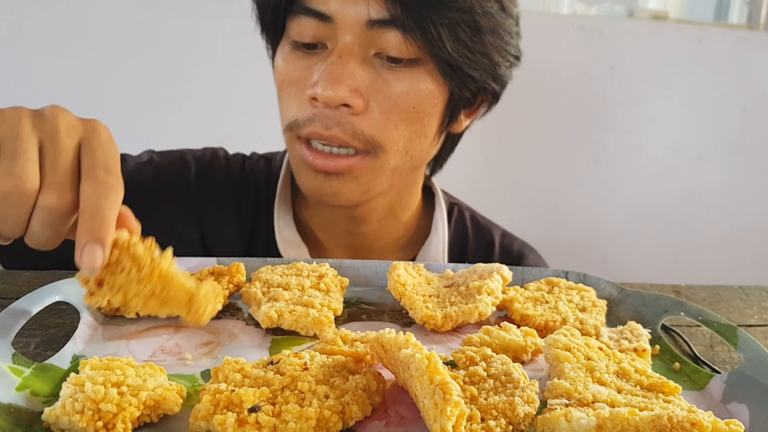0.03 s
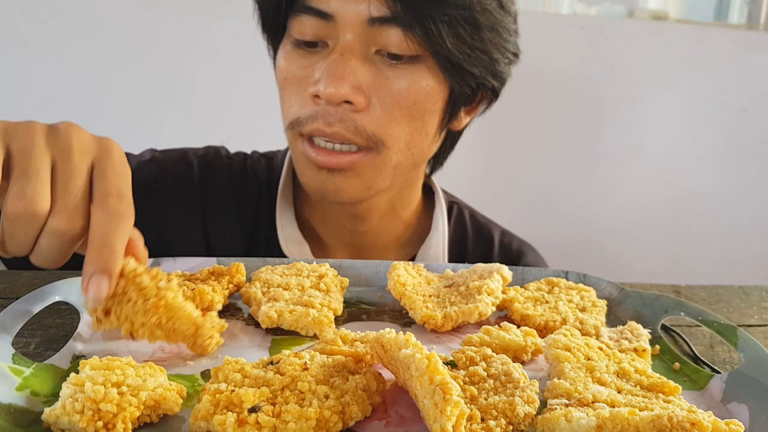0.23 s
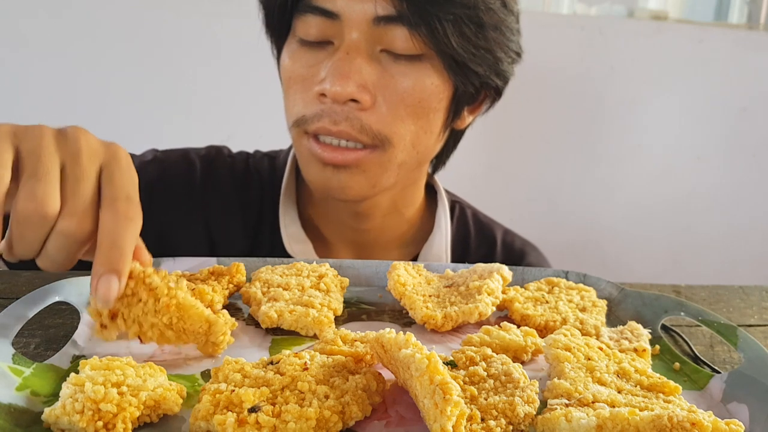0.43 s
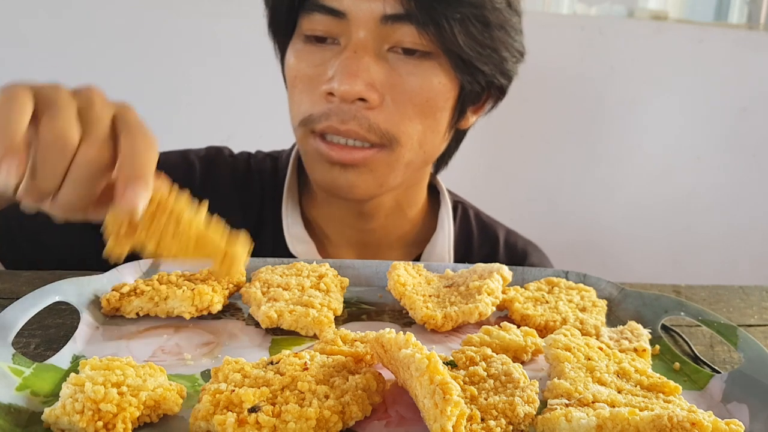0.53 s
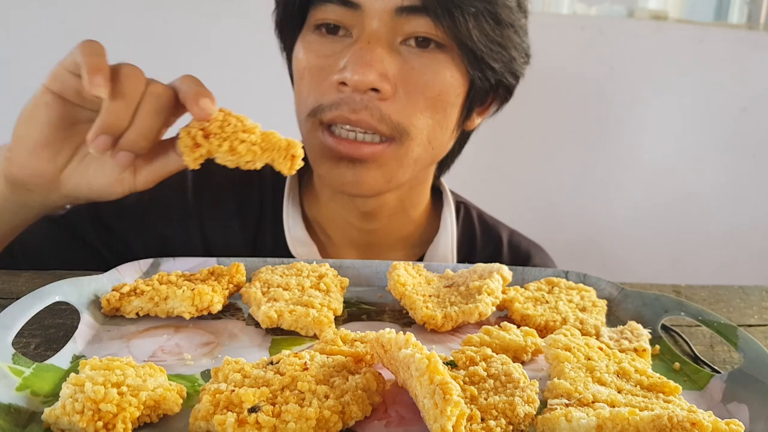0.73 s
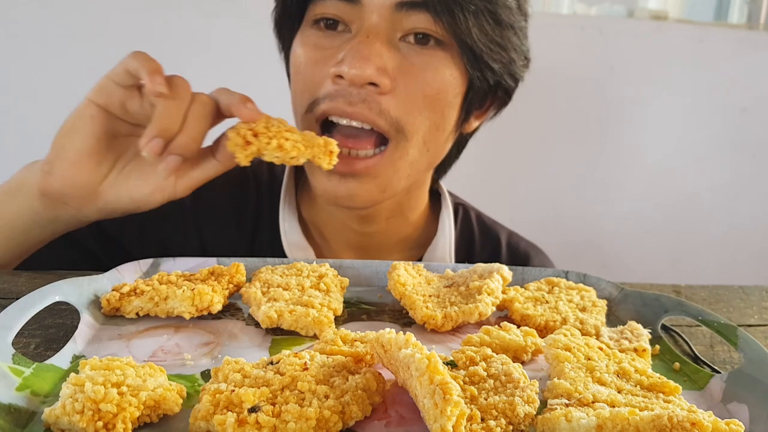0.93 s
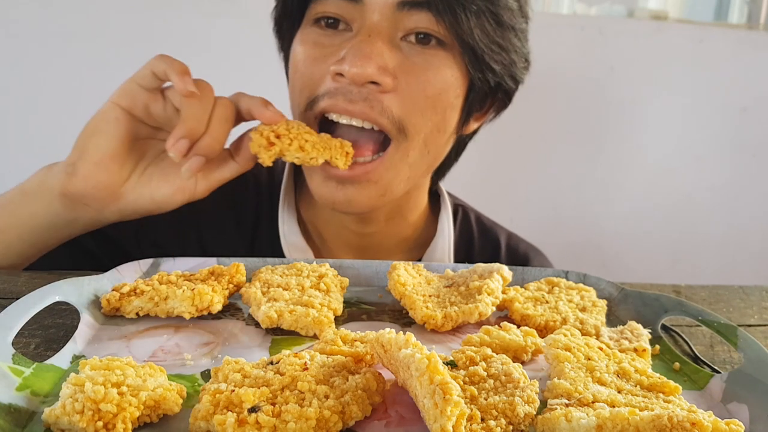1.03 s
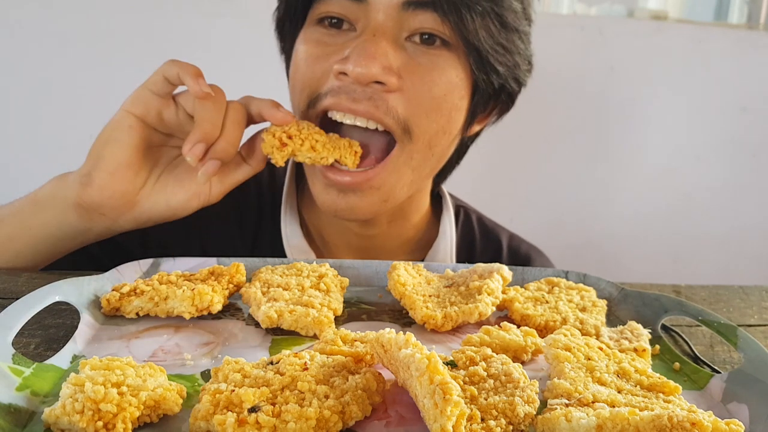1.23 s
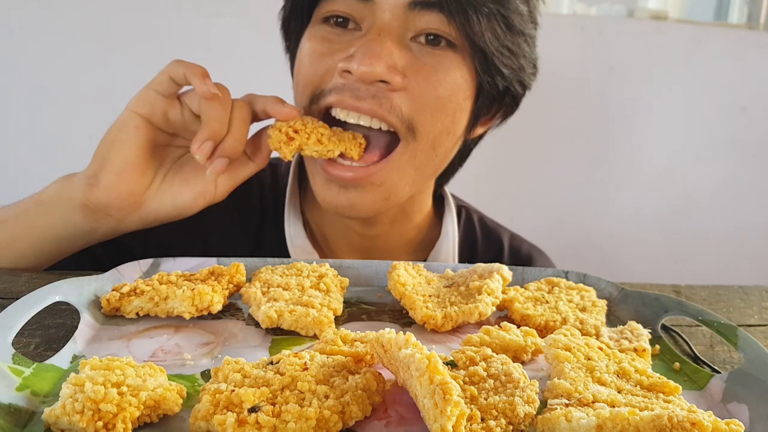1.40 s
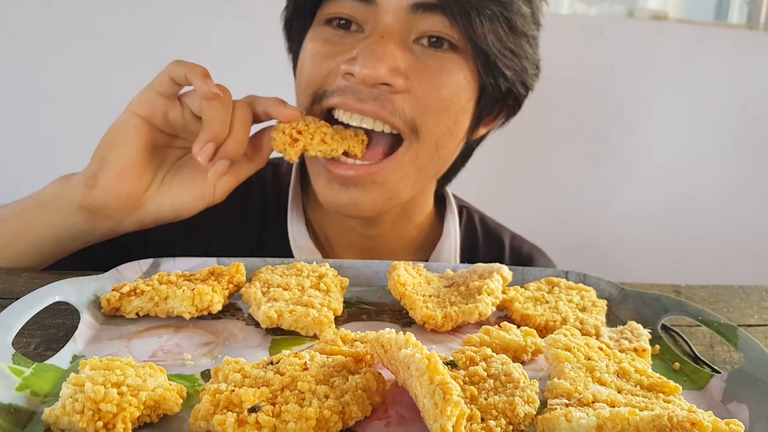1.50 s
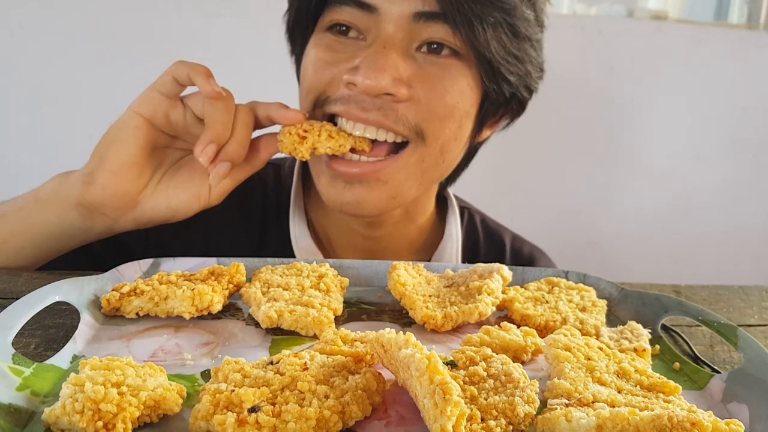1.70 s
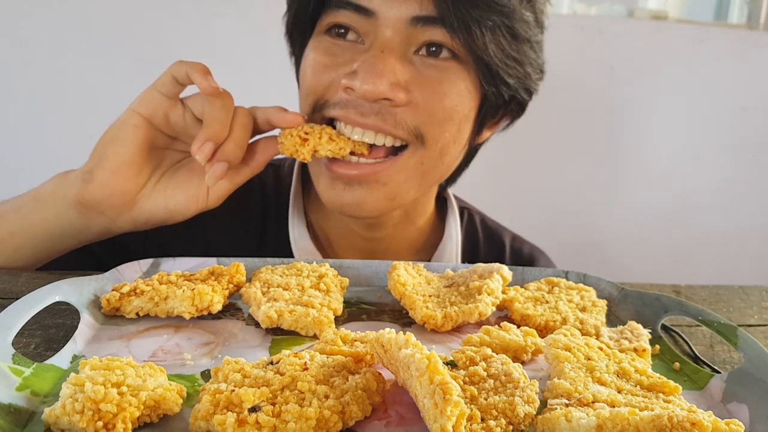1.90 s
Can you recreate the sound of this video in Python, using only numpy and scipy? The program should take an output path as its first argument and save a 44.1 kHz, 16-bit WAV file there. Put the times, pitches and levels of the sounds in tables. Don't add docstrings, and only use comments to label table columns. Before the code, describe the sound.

Crispy fried food knocked twice on a plastic plate, then bitten with a brittle crackling crunch

```python
import sys
import numpy as np
from scipy import signal
from scipy.fft import rfft, irfft
from scipy.io import wavfile
from scipy.ndimage import uniform_filter1d

SR = 44100
rng = np.random.default_rng(int(sys.argv[2]) if len(sys.argv) > 2 else 0)


def gain_from_db(level_db):
    decades = np.asarray(level_db, float) / 20
    return 10 ** decades


def log_audio(samples):
    frames = np.atleast_2d(samples).T
    limited = np.clip(frames, -1, 1)
    pcm = np.round(limited * 32767).astype(np.int16)
    wavfile.write(sys.argv[1], SR, pcm)


N = 85995


def rms_one(x):
    return x / np.sqrt(np.mean(x ** 2) + 1e-20)


def in_time(rows):
    s, db = np.transpose(rows)
    return np.interp(np.arange(N) / SR, s, db, left=-120, right=-120)


def at_hz(points, hz):
    table_hz, values = np.transpose(points)
    return np.interp(np.log(hz), np.log(table_hz), values)


def low_pass(x, hz, order=2):
    return signal.sosfilt(signal.butter(order, hz, fs=SR, output="sos"), x)


def high_pass(x, hz, order):
    return signal.sosfilt(signal.butter(order, hz, "high", fs=SR, output="sos"), x)


def click_at(s, height):
    click = np.zeros(N)
    click[int(s * SR)] = height
    return click


def ring(clicks, hz, t60):
    r, w = gain_from_db(-60 / (t60 * SR)), 2 * np.pi * hz / SR
    return signal.lfilter([0, np.sin(w)], [1, -2 * r * np.cos(w), r * r], clicks + 1e-18)


def drift(rate):
    hop, settle = 40, 2000
    r = np.exp(-2 * np.pi * rate * hop / SR)
    white = rng.standard_normal(N // hop + settle + 2)
    slow = signal.lfilter([1], [1, -2 * r, r * r], white)[settle:]
    return np.interp(np.arange(N) / hop, np.arange(len(slow)), rms_one(slow - slow.mean()))


def coloured(x, spectrum):
    hz = np.maximum(np.fft.rfftfreq(N, 1 / SR), 1)
    return rms_one(irfft(rfft(x) * gain_from_db(at_hz(spectrum, hz)), N))


def dying(starts, spectrum, t60s, rise_s):
    edges = 60 * 2 ** np.arange(0, 8.3, 1 / 3)
    t, out, power = np.arange(N) / SR, 0, 0
    white = rng.standard_normal((2, N))
    for k, (low, high) in enumerate(zip(edges, edges[1:])):
        hz = np.sqrt(low * high)
        energy, t60 = np.zeros(N), at_hz(t60s, hz)
        for s, db in starts:
            span = slice(max(int(s * SR) + 1, 0), int((s + 2 * t60) * SR))
            since = t[span] - s
            fall = gain_from_db(db - 60 * since / t60)
            energy[span] += (fall * (1 - np.exp(-since / rise_s))) ** 2
        band_pass = signal.butter(2, [low, high], "band", fs=SR, output="sos")
        band = gain_from_db(at_hz(spectrum, hz)) * signal.sosfilt(band_pass, white[k % 2])
        out = out + band * np.sqrt(energy)
        power = power + np.mean(band ** 2)
    return out / np.sqrt(power)


# (frequency [Hz], level [dB per Hz])
AIR_SPECTRUM = [(100, -25), (300, -21), (1000, -35), (2300, -38), (4000, -27), (9500, -35), (12000, -42),
                (16000, -49)]
AIR_DB = -67.5
# (time [s], level [dB])
GATE = [
    (0, -1),
    (.5, 2),
    (.72, -2),
    (1.595, -1),
    (1.61, 4),
    (1.95, 5),
]
# (time [s], level [dB])
THROB = [(0, -37.5), (.15, 7), (.59, -12), (.645, 16.5), (.7, -6), (.78, 7.5), (.83, 9.5), (.87, 1.5),
         (.95, 15.5), (1.01, 1.5), (1.06, 6), (1.13, 0), (1.19, 10), (1.26, -12), (1.45, -4), (1.6, -5),
         (1.95, -4)]
# (time [s], level [dB])
HUM = [
    (1.3, -84),
    (1.42, -71),
    (1.5, -65),
    (1.58, -73.5),
    (1.62, -59.5),
    (1.66, -83),
]
# (time [s], level [dB])
LOWER_HUM = [
    (1.58, -87),
    (1.63, -62),
    (1.68, -79.5),
    (1.74, -69.5),
    (1.8, -80),
    (1.86, -64),
    (1.95, -49.5),
]


def room_air():
    throb_hz, throb_width_hz, throb_db = 72, 22, -66
    hum_hz, lower_hum_hz = 341, 290
    white = rng.standard_normal((3, N + SR))
    throb = rms_one(ring(ring(white[0], throb_hz, 1.6 / throb_width_hz), throb_hz, .06)[SR:])
    throb = throb / np.sqrt(uniform_filter1d(throb ** 2, size=2600) + .15)
    hum = rms_one(ring(ring(white[1], hum_hz, .22), hum_hz, .017)[SR:])
    lower = rms_one(ring(ring(white[2], lower_hum_hz, .11), lower_hum_hz, .04)[SR:])
    hiss = rms_one(high_pass(coloured(rng.standard_normal(N), AIR_SPECTRUM), 60, 2))
    air = gain_from_db(AIR_DB + in_time(GATE) + 1.2 * drift(3.6)) * hiss
    engine = gain_from_db(throb_db + in_time(THROB)) * throb
    motor = gain_from_db(in_time(HUM)) * hum + gain_from_db(in_time(LOWER_HUM)) * lower
    return air + engine + motor


# (time [s], level [dB], frequency [Hz], t60 [s])
BUMPS = [
    (1.767, -35, 55.8, 0.13),
    (1.835, -39, 58, 0.12),
]


def bumps():
    out = 0
    for s, db, hz, t60 in BUMPS:
        push = low_pass(click_at(s, gain_from_db(db)), 1.76 * hz)
        out = out + ring(push, hz, t60)
    return out


# (time [s], level [dB])
MOVING = [
    (0, -76),
    (.09, -69.5),
    (.17, -61.5),
    (.205, -50),
    (.22, -69),
    (.38, -71.5),
    (.41, -64.5),
    (.43, -70.5),
    (.75, -78),
]
# (frequency [Hz], level [dB per Hz])
RUSTLE_SPECTRUM = [(1180, -63), (2000, -34), (2450, -11), (3020, -13.5), (4770, 0.5), (12000, -16),
                   (15600, -46), (22000, -120)]


def rustle():
    return gain_from_db(in_time(MOVING) + 1.7 * drift(25)) * coloured(rng.standard_normal(N), RUSTLE_SPECTRUM)


# (time [s], level [dB])
KNOCKS = [
    (-.2, -1),
    (.210, -5.5),
    (0.4154, -5),
]
# (frequency [Hz], level [dB per Hz])
ANSWER_SPECTRUM = [(100, -9), (300, -6), (1000, -16), (2800, -19), (5000, -23.5), (6200, -33.5),
                   (9000, -38.5), (14000, -47.5)]
# (frequency [Hz], t60 [s])
ANSWER_T60 = [(100, 0.69), (500, 0.49), (2000, 0.61), (5000, 0.75), (12000, 0.19)]


def room_answer():
    earlier = dying(KNOCKS[:1], ANSWER_SPECTRUM, ANSWER_T60, rise_s=.0035)
    later = dying(KNOCKS[1:], ANSWER_SPECTRUM, ANSWER_T60, rise_s=.015)
    return gain_from_db(-31) * (low_pass(earlier, 1400, 4) + later)


# (frequency [Hz], level [dB per Hz])
RATTLE_SPECTRUM = [(180, -28.5), (300, 4), (850, -10.5), (1250, -1.5), (1530, -13), (2210, -15.5),
                   (3830, 1), (16000, -45)]
# (frequency [Hz], t60 [s])
RATTLE_T60 = [(300, 0.076), (800, 0.088), (1500, 0.078), (5000, 0.023), (14000, .01)]


def rattle():
    starts = [(s, db) for s, db, _ in TOUCHES]
    return gain_from_db(-7) * dying(starts, RATTLE_SPECTRUM, RATTLE_T60, rise_s=.0004)


# (frequency [Hz], level [dB per Hz])
DUST_SPECTRUM = [(600, -7), (1500, -20), (4500, 0), (9000, -24), (15500, -15.5)]
# (frequency [Hz], t60 [s])
DUST_T60 = [(1000, 0.048), (5000, 0.0087), (15000, 0.02)]


def dust():
    starts = [(s, db) for s, db, *_ in CRACKS]
    return gain_from_db(-18) * dying(starts, DUST_SPECTRUM, DUST_T60, rise_s=.00009)


# (time [s], level [dB])
PRESSURE = [
    (1.598, -65),
    (1.608, -54.5),
    (1.67, -54.5),
    (1.74, -50),
    (1.78, -56),
    (1.8, -49),
    (1.82, -56),
    (1.87, -56.5),
    (1.95, -51),
]
# (frequency [Hz], level [dB per Hz])
CRUMBLE_SPECTRUM = [(400, -7), (839, -11.5), (1030, -5), (1580, -7.5), (2600, -2.5), (4800, -3),
                    (6800, -6.5), (8500, -15), (16000, -40)]


def crumble():
    crumbs_per_s, spread_db, click_share = 2500, 3.0, .3
    sizes = gain_from_db(spread_db * np.minimum(rng.exponential(1, N), 4)) * rng.choice([-1, 1], N)
    breaks = rng.random(N) < crumbs_per_s * gain_from_db(5 * drift(25)) / SR
    grains = rms_one(sizes * breaks)
    mix = click_share * grains + np.sqrt(1 - click_share ** 2) * rng.standard_normal(N)
    return gain_from_db(in_time(PRESSURE)) * coloured(mix, CRUMBLE_SPECTRUM)


# (time [s], strength [dB], pitch [Hz])
TICKS = [(.2335, -40, 9200), (.2345, -33, 12200), (.2360, -45, 13860), (1.1625, -43, 7400),
         (1.670, -41.5, 5900), (1.682, -40.5, 6200), (1.6825, -42.5, 3300), (1.693, -32.5, 6180),
         (1.732, -39, 6200), (1.774, -44, 6000), (1.789, -31.5, 5730), (1.7985, -31.5, 5780),
         (1.7993, -33, 3620), (1.8008, -26.5, 6000), (1.8887, -21, 6017), (1.8891, -32.5, 5014)]


def ticks():
    out = np.zeros(N)
    for s, db, hz in TICKS:
        click, t60 = click_at(s, gain_from_db(db)), 14 / hz
        rings = ring(click, hz, t60)
        rings -= .7 * ring(click, 1.17 * hz, t60)
        rings += .3 * ring(click, .75 * hz, .6 * t60)
        out += high_pass(rings, .6 * hz, 2)
    return out


# (time [s], strength [dB], length [s], share that rings the open mouth [dB])
CRACKS = [(1.8762, -20, 0.00066, -24.5), (1.8777, -10.5, 0.00091, 2), (1.8785, -17, .0007, -34),
          (1.8794, -16.5, 0.00078, -38), (1.8807, -20, 0.00043, -10.5), (1.8812, -21.5, 0.00059, -20),
          (1.8893, -29.5, 0.00089, -8.5), (1.8989, -37, .001, -18.5), (1.9010, -35, .001, -9),
          (1.9022, -26, 0.001, -8), (1.9061, -27, .0018, -8.5), (1.9085, -37, .0015, -18),
          (1.9117, -35, .001, -18.5), (1.9130, -18.5, .0005, -33), (1.9135, -18.5, 0.00103, 1.5),
          (1.9146, -22.5, .001, -20), (1.9170, -24, 0.0017, -4), (1.9204, -32, 0.0021, -6),
          (1.9223, -24.5, 0.00076, -1), (1.9245, -28.5, 0.0022, -17.5), (1.9274, -20.5, .001, 1)]
# (frequency [Hz], level [dB], t60 [s])
CAKE_MODES = [(980, -17.5, 0.0087), (2070, -32, .004), (3020, -8, 0.017), (3380, -8.5, 0.0065),
              (4090, -2.5, 0.0046), (4670, -5, 0.0048), (5570, -7, .006), (6200, -2.5, 0.0071),
              (6700, -4, 0.0051), (7400, -13.5, 0.0046), (9320, -16, 0.0037), (13040, -21, 0.0035)]


def cracks():
    splits_per_s = 8100
    t, splits, mouth = np.arange(N) / SR, np.zeros(N), np.zeros(N)
    run = rng.standard_normal(N) * (rng.random(N) < splits_per_s / SR)
    for s, db, length, mouth_db in CRACKS:
        splits -= click_at(s, gain_from_db(db))
        mouth -= click_at(s, gain_from_db(db + mouth_db))
        during = (t > s) * (t < s + length)
        splits += 0.42 * gain_from_db(db) * run * during * np.exp(-np.abs(t - s) / length)
    rings = 0
    for hz, db, t60 in CAKE_MODES:
        luck = gain_from_db(2.5 * rng.standard_normal(N))
        rings = rings + 0.44 * gain_from_db(db) * ring(splits * luck, hz, t60)
    cavity = ring(mouth, 1440, .017) + gain_from_db(-20) * ring(mouth, 630, .02)
    return high_pass(rings + 1.1 * splits, 850, 3) + high_pass(0.61 * cavity, 945, 2)


# (time [s], strength [dB], hardness [Hz])
TOUCHES = [(0.2086, -29.5, 2950), (.2100, 0.5, 7400), (0.2115, -5.5, 3870), (0.2139, -17, 2950),
           (0.2147, -5.5, 4950), (0.2169, -7, 6400), (0.2332, -23.5, 9000), (.356, -51, 6000),
           (0.4107, -35.5, 2220), (.4148, 1.5, 6900), (.4163, -12.5, 5100), (0.419, -8.5, 3985),
           (.4200, -3.5, 3950), (0.4222, -5, 5140), (0.4259, -14.5, 4000), (0.4312, -19, 5000)]
# (frequency [Hz], level [dB], t60 [s])
PLATE_MODES = [(743, -18.5, 0.073), (858, -18, 0.1), (1087.4, -13.5, 0.093), (1254, -25, 0.1),
               (1465, -21, 0.064), (1673, -10, 0.032), (1820, -16.5, 0.086), (2138.5, -5.5, 0.033),
               (2880, -18, 0.037), (3041, -7.5, 0.031), (3280, -21.5, .03), (3800, -10.5, 0.11),
               (3830, -17, 0.031)]
# (frequency [Hz], level [dB], t60 [s])
TABLE_MODES = [(146, -15.5, .1), (158.4, -6.5, .07), (172, -33.5, 0.46), (212, -5, 0.031), (240, -8, 0.088),
               (273.3, -16.5, 0.16), (345, -10, 0.077), (443.2, 0, 0.052), (556.5, -12.5, 0.12),
               (640, -5.5, 0.021)]
# (frequency [Hz], level [dB], t60 [s])
SWAY_MODES = [(75.5, -29, .5), (78.7, -30, .5)]


def plate_knocks():
    length = SR // 2
    out = np.zeros(N)
    for s, db, hard_hz in TOUCHES:
        click = np.zeros(length)
        click[0] = gain_from_db(db - 6)
        hard = low_pass(click, hard_hz)
        sound = 3.6 * signal.lfilter([1, -1], [1, -.8], hard) + 3.2 * ring(hard, 2400, .003)
        for k, (hz, level_db, t60) in enumerate(PLATE_MODES):
            strength = (-1) ** k * gain_from_db(level_db + 3.5 * rng.standard_normal())
            sound = sound + strength * ring(hard, hz, min(t60, 62 / hz))
        start = int(s * SR)
        out[start:start + length] += sound
    return out


def table_knocks():
    lag_s, soft_hz = .0026, 897
    out = np.zeros(N)
    for s, db in KNOCKS[1:]:
        push = low_pass(click_at(s + lag_s, -gain_from_db(db)), soft_hz)
        bend = 0
        for hz, level_db, t60 in TABLE_MODES:
            bend = bend + gain_from_db(level_db + 0.5 * rng.standard_normal()) * ring(push, hz, t60)
        out += high_pass(bend, 160, 3)
        out += sum(gain_from_db(level_db) * ring(push, hz, t60) for hz, level_db, t60 in SWAY_MODES)
    return out


def scene():
    side_db, hiss_side_db = -33.5, -19.5
    near = bumps() + rustle() + room_answer() + rattle() + dust()
    near = near + crumble() + ticks() + cracks() + plate_knocks() + table_knocks()
    side = gain_from_db(side_db) * np.roll(0.35 * np.diff(near, prepend=0) + 0.73 * near, 37)
    side = side + gain_from_db(AIR_DB + hiss_side_db) * coloured(rng.standard_normal(N), AIR_SPECTRUM)
    return near + room_air() + side * np.array([[1], [-1]])


def roll_off(x):
    return signal.sosfilt(signal.butter(12, 16370, fs=SR, output="sos"), x)


def record(dry):
    clip_top, cutoff_hz = 1.03, 16600
    heard = np.clip(high_pass(dry, 58.7, 3), -clip_top, clip_top)
    heard = signal.sosfilt(signal.cheby2(10, 35, cutoff_hz, fs=SR, output="sos"), heard)
    return roll_off(heard)


dry = scene()
out = record(dry)
log_audio(out)
```